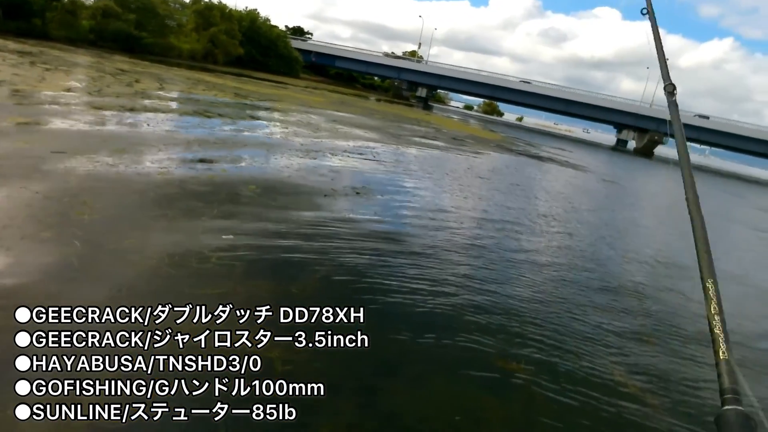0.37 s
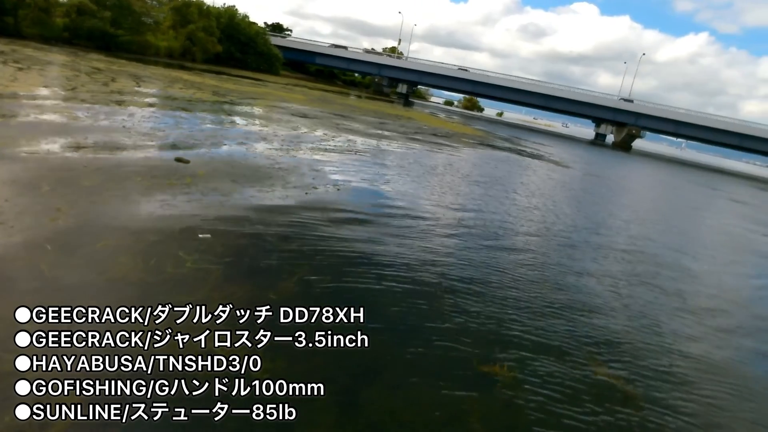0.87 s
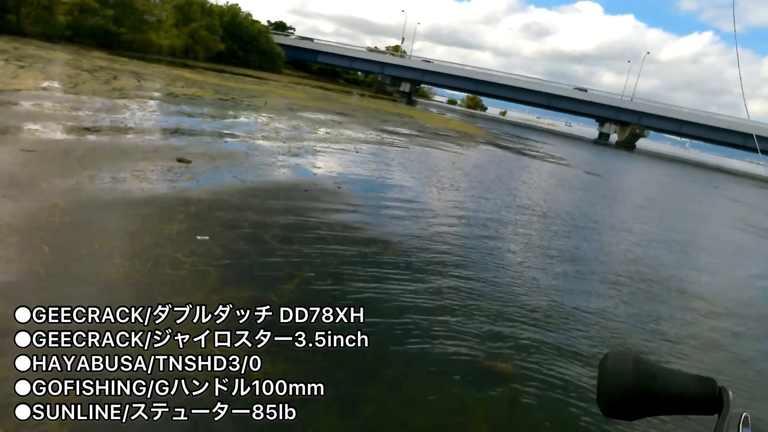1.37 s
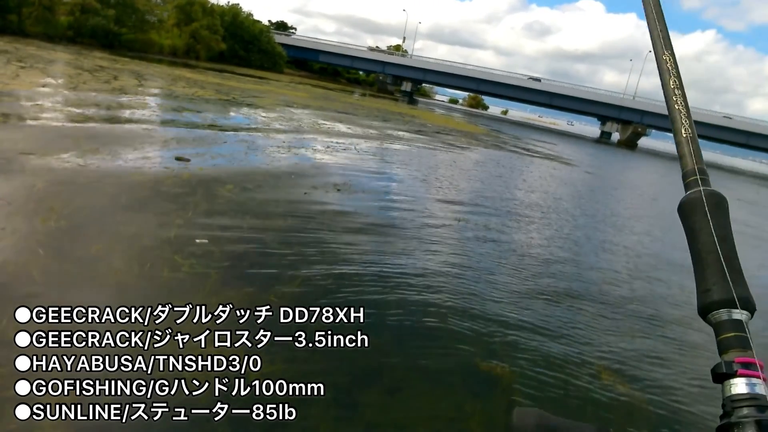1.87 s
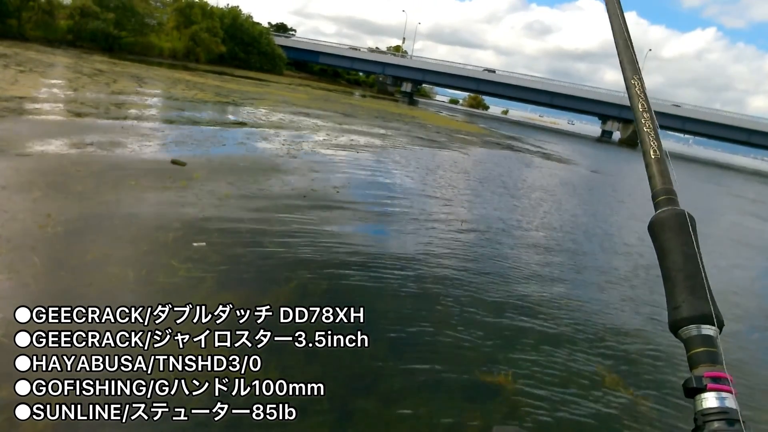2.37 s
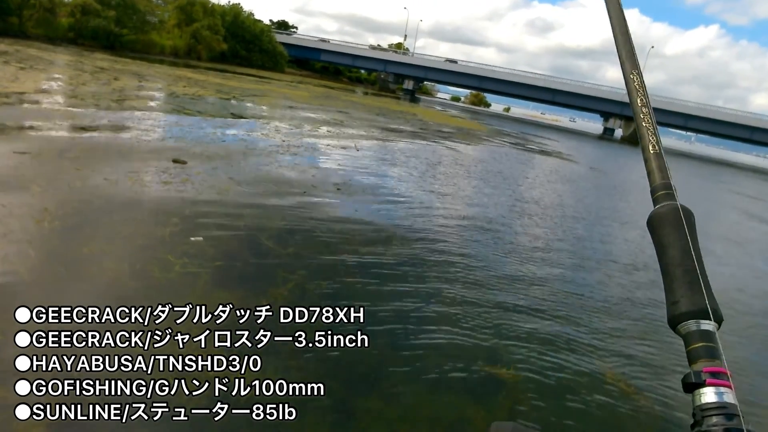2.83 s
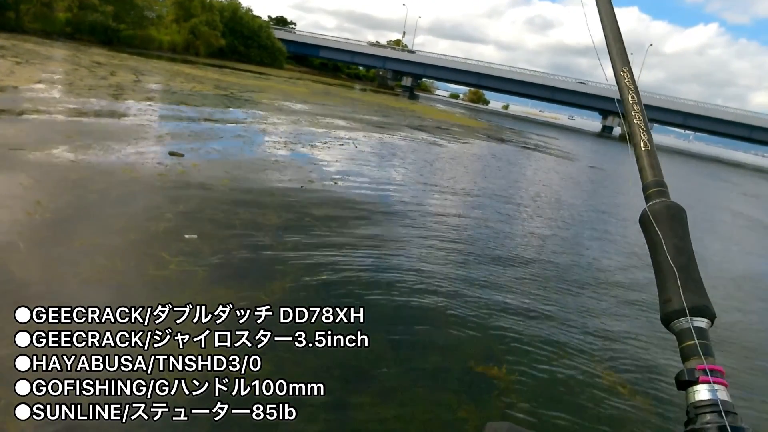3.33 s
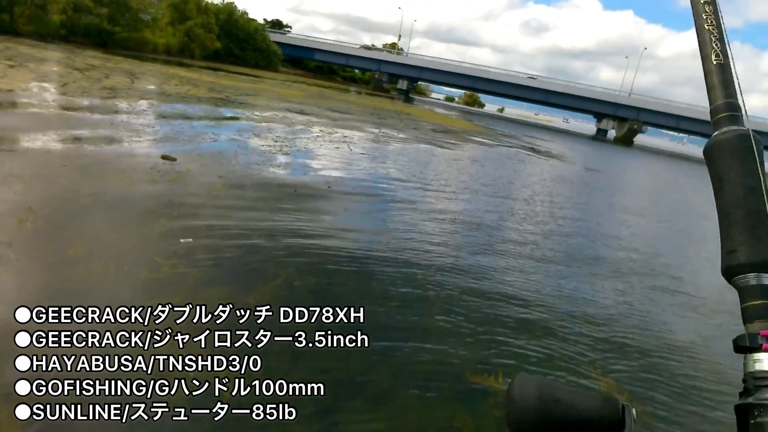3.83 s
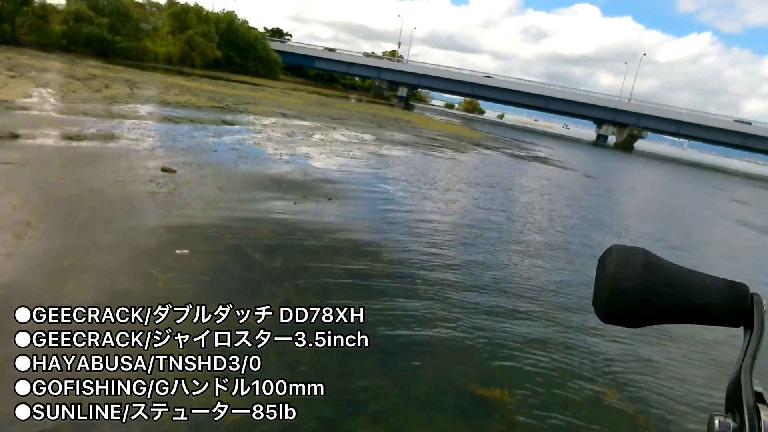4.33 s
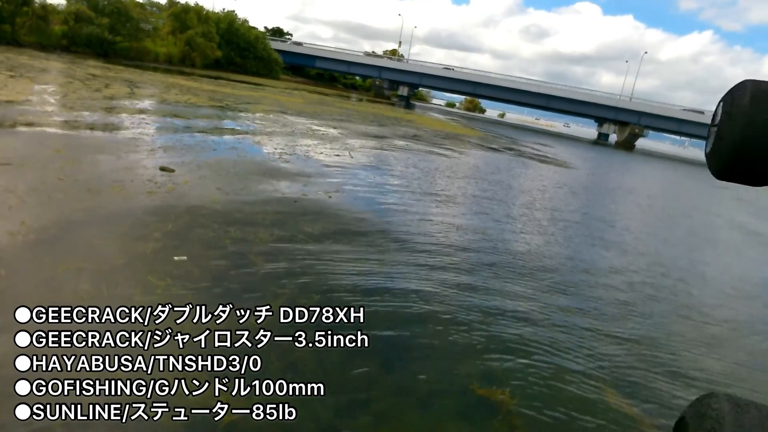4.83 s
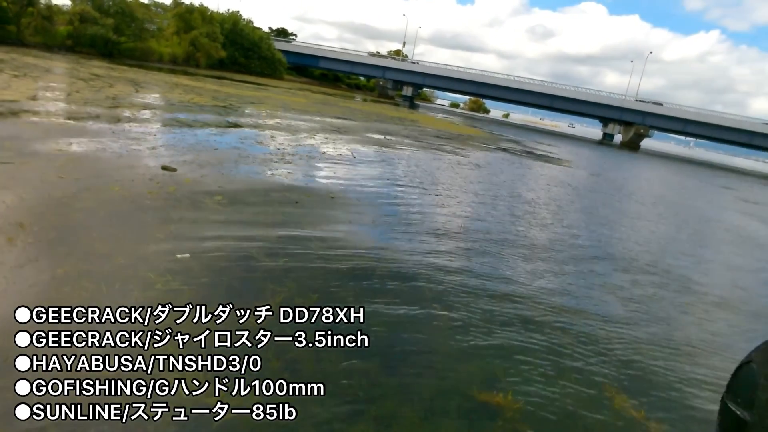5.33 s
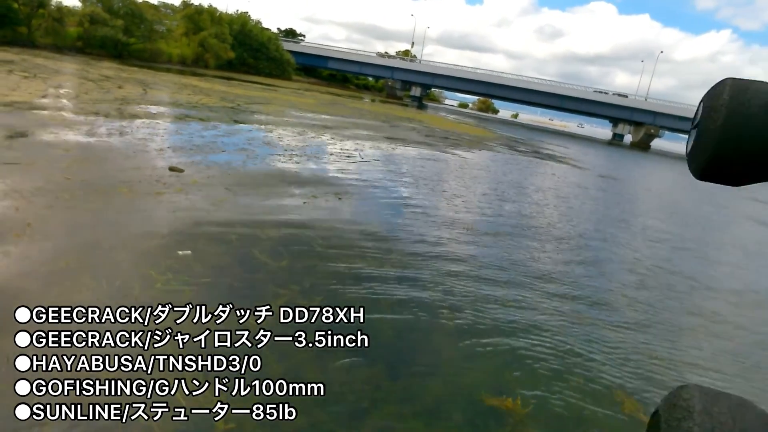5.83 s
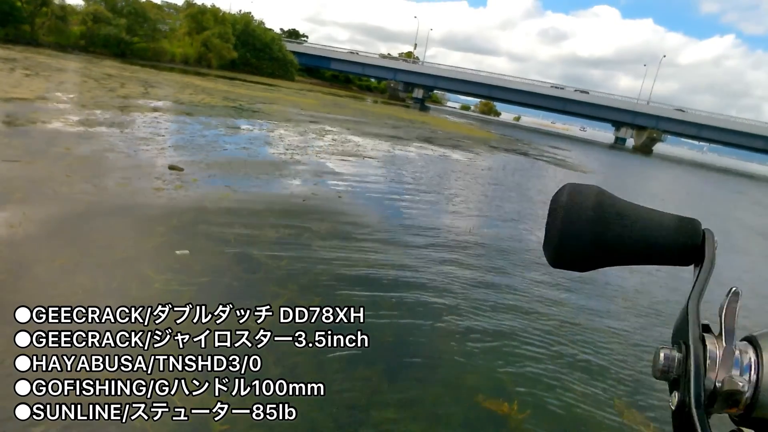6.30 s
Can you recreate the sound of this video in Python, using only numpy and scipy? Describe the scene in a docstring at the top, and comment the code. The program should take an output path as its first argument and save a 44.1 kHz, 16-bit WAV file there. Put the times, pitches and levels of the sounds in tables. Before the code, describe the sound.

Far-off engine note rises and drops through two gear changes above a deep throbbing motor, with a brief reel squeak and faint camera hiss.

```python
"""A road bridge over open water, two engines accelerating on it, heard by a small camera on the far side.
The high one, a stack of firing multiples, climbs and shifts gear twice; returns from piers, a bank and
the far shore shadow it. The low one throbs under it, shaft multiples sliding through pipe resonances.
Shaped noise makes the traffic roar, its fluttering edge and a rasp; a reel squeaks and ticks, and the
camera adds hiss, whines and a periodic buzz."""
import sys
import numpy as np
from scipy import signal
from scipy.fft import rfft, irfft, next_fast_len
from scipy.io import wavfile
from scipy.ndimage import uniform_filter1d

SR = 44100
rng = np.random.default_rng(int(sys.argv[2]) if len(sys.argv) > 2 else 0)


def digitize_waveform(pressure):
    """Quantize a signal to 16-bit integers and store it at the path in sys.argv[1].

    Rows of a 2-D input are taken as channels; values are limited to [-1, 1].
    """
    field = np.atleast_2d(pressure).T
    bounded = np.clip(field, -1, 1)
    quanta = np.round(bounded * 32767).astype(np.int16)
    wavfile.write(sys.argv[1], SR, quanta)


def voltage_ratio(level):
    """Linear amplitude factor for a level in decibels (scalar or array-like)."""
    return 10 ** (np.asarray(level, float) / 20)


N = 283771

# High engine over time. Each row: time in seconds, firing rate in Hz, level before the exhaust in dB,
# highest clear multiple.
HIGH_RUN = [(0, 121.4, -38, 2), (0.448, 140.1, -33.5, 3.5), (.68, 149.8, -30.5, 3.6), (.9, 160.7, -25, 3.8),
            (1.2, 169.1, -28.5, 2.2), (1.399, 175, -27, 2), (1.661, 187.9, -28, 2.2),
            (1.771, 193.1, -21, 4.6), (2.2, 204.7, -27, 4), (2.6, 216.7, -25, 4), (3.01, 226.2, -22, 4.2),
            (3.13, 229.6, -22, 3), (3.2, 231.3, -26.5, 4), (3.28, 233, -22, 2.6), (3.36, 234.7, -22, 2.3),
            (3.43, 237.6, -18.5, 2.2), (3.499, 241.5, -22, 2.4), (3.63, 247.6, -25.5, 2.4),
            (3.829, 248, -17.5, 1.7), (3.981, 250.7, -19.5, 1.7), (4.098, 254.7, -24.5, 2.3),
            (4.239, 256.8, -27.5, 2.2), (4.368, 227.9, -12.5, .8), (4.478, 215, -26, 1.5),
            (4.528, 221.3, -21, 1.8), (4.62, 274.3, -19, 1.6), (4.681, 304.7, -18.5, 1.6),
            (4.76, 232.9, -22, .8), (4.829, 227, -18.5, .6), (5.001, 225, -17, .6), (5.152, 223.5, -18, .6),
            (5.22, 221.9, -19, .6), (5.297, 214.6, -16.5, .6), (5.361, 200.3, -22.5, .6),
            (5.429, 184, -26, .8), (5.499, 170.9, -19.5, 1.8), (5.561, 154.4, -26.5, 1),
            (5.617, 140.9, -25, 1), (5.66, 155.5, -27, 1.3), (5.689, 189.9, -23, 2),
            (5.75, 176.9, -20.5, 1.8), (5.84, 176.7, -17, 1.5), (6, 178.5, -18.5, 1.6),
            (6.13, 180.9, -21, 1.7), (6.268, 184.2, -23, 1.8), (6.43, 190, -21.5, 1.7)]
# Swells and dips of roar and rasp. Each row: centre in seconds, half length in seconds, change in dB.
NOISE_SWELLS = [(.95, 0.19, 4), (2.1, 0.16, 0), (3.4, 0.31, 2.5), (4.2, 0.17, 0), (4.75, 0.16, 3),
                (6, 0.35, -2.5)]


def evened(x):
    """Scales to rms 1."""
    return x / np.sqrt(np.mean(x ** 2) + 1e-20)


def read(points, hz):
    """Reads a spectrum table at given frequencies, straight in log frequency."""
    table_hz, value = np.transpose(points)
    return np.interp(np.log(hz + 1), np.log(table_hz + 1), value)


def columns(rows):
    """First sample of a timed table, and its columns joined by straight lines."""
    s, *rest = np.transpose(rows)
    start = round(s[0] * SR)
    t = np.arange(start, min(round(s[-1] * SR), N)) / SR
    return start, [np.interp(t, s, c) for c in rest]


def add(mix, start, sound):
    """Mixes a sound in from a sample on."""
    part = mix[start:][:len(sound)]
    part += sound[:len(part)]


def drift(length, top_hz):
    """Random wavering below top_hz, rms about 1."""
    lowpass = signal.butter(2, top_hz, fs=SR / 64)
    slow = signal.lfilter(*lowpass, rng.standard_normal(length // 64 + 300))[200:]
    return np.interp(np.arange(length) / 64, np.arange(len(slow)), evened(slow))


def coloured(points):
    """Noise with the given spectrum, rms 1."""
    size = next_fast_len(N)
    hz = np.fft.rfftfreq(size, 1 / SR)
    spectrum = rfft(rng.standard_normal(size)) * voltage_ratio(read(points, hz))
    return evened(irfft(spectrum, size)[:N])


def partial(hz, db, twinkle_db, sway_rad):
    """A sine whose level and phase waver in the moving air over the water."""
    phase = 2 * np.pi * (np.cumsum(hz) / SR + rng.random())
    phase = phase + sway_rad * drift(len(hz), top_hz=9.84)
    level_db = db + twinkle_db * drift(len(hz), top_hz=9.4)
    return np.sqrt(2) * voltage_ratio(level_db) * np.sin(phase)


def bumps(rows):
    """A dB curve made of bell-shaped swells and dips."""
    t = np.arange(N) / SR
    return sum(db * np.exp(-((t - s) / half_s) ** 2) for s, half_s, db in rows)


def effort_db(follow, db_per_oct):
    """A level change that follows the high engine's smoothed level and speed; 0 dB at -22 dB, 200 Hz."""
    smooth_s = 0.18
    s, hz, db, _ = np.transpose(HIGH_RUN)
    change_db = follow * (db + 22) + db_per_oct * np.log2(hz / 200)
    return uniform_filter1d(np.interp(np.arange(N) / SR, s, change_db), round(smooth_s * SR))


def camera():
    """Electronics: steady hiss, thin whines, a tone blip per picture and a noise burst per write."""
    # Hiss spectrum. Each row: Hz, relative level in dB per Hz.
    hiss_colour = [(2000, -9), (2600, -8.5), (3100, -8.5), (4580, -10.5), (5680, -12), (8440, -15),
                   (9860, -13.5), (10800, -15), (14400, -14.5), (15700, -19)]
    # Whines. Each row: Hz, level before wavering in dB rms.
    whines = [(12602, -94), (14503, -91), (14530, -90), (14562, -87)]
    pictures_per_s, first_picture_s = 30.03, .0153
    write_every_s, first_write_s = 1.012, .72
    t = np.arange(N) / SR
    # distances from the nearest event, in cycles
    from_picture = ((t - first_picture_s) * pictures_per_s + .5) % 1 - .5
    from_write = ((t - first_write_s) / write_every_s + .5) % 1 - .5
    blips = np.exp(-(from_picture / 0.049) ** 2) * partial(np.full(N, 9770.), 0, twinkle_db=1.0, sway_rad=.8)
    burst_colour = [(8500, -25.5), (9400, 5.0), (10500, -4.0), (11500, -8.0), (13500, -8), (14500, 1.5),
                    (15500, -18.5)]  # Hz, relative dB
    bursts = np.exp(-(from_write / 0.012) ** 4) * coloured(burst_colour)
    whine = sum(partial(np.full(N, hz), db, twinkle_db=1.5, sway_rad=.3) for hz, db in whines)
    hiss = coloured([(1200, -35.0)] + list(hiss_colour))
    return voltage_ratio(-65) * hiss + voltage_ratio(-66.0) * blips + voltage_ratio(-62.0) * bursts + whine


def roar():
    """Dull noise of tyres, intake and scattered exhaust: distance has taken the treble."""
    # Each row: Hz, relative level in dB per Hz.
    roar_colour = [(15, 1.5), (40, 17), (80, 14), (130, 8), (250, 16), (450, 12.5), (700, 8.5), (1000, 5.5),
                   (1350, -5), (1600, -17.5), (1900, -21), (2250, -26), (3000, -39)]
    level_db = -31.5 + effort_db(follow=0.031, db_per_oct=2) + bumps(NOISE_SWELLS)
    return voltage_ratio(level_db + 1.3 * drift(N, top_hz=3.2)) * coloured(roar_colour)


def grit():
    """The upper edge of the traffic noise, fluttering quickly and drifting slowly."""
    # Each row: Hz, relative level in dB per Hz.
    grit_colour = [(1180, -28), (1700, 2), (2100, -2), (2600, -7), (3200, -20)]
    level_db = -66.5 + 2.5 * drift(N, top_hz=25) + 1.5 * drift(N, top_hz=4)
    return voltage_ratio(level_db) * coloured(grit_colour)


def rasp():
    """Faint bands of metallic noise that come with load; they swell further than the roar."""
    # Each row: Hz, relative level in dB.
    rasp_colour = [(2900, -22), (3500, -2), (3800, 0), (4150, -4), (4550, -2), (5200, -12), (6300, -6),
                   (7500, -22)]
    level_db = -77 + effort_db(follow=.3, db_per_oct=10) + 1.5 * bumps(NOISE_SWELLS)
    return voltage_ratio(level_db + 1.6 * drift(N, top_hz=8)) * coloured(rasp_colour)


def reel():
    """A thin two-partial squeak that jumps up, arches over and trails off; short decaying ticks."""
    # Squeak. Each row: time in seconds, Hz, level in dB rms and octave level in dB rms before wavering.
    squeak = [(1.148, 2300, -68, -80), (1.162, 2370, -60, -70), (1.19, 2630, -56, -73),
              (1.196, 2860, -72, -84), (1.205, 2900, -66, -75), (1.232, 2850, -66, -78),
              (1.25, 2660, -63, -84), (1.255, 2470, -60, -70), (1.275, 2390, -64, -74),
              (1.31, 2290, -67, -77), (1.355, 2200, -68, -82), (1.42, 2020, -71, -87),
              (1.5, 1880, -76, -95)]
    # Ticks. Each row: start in seconds, sine level before rise and decay in dB peak, Hz, t60 in seconds.
    ticks = [(1.653, -55, 6600, .014), (1.653, -56, 8800, .014), (1.656, -54, 4100, .014),
             (1.659, -55, 4000, .016), (1.663, -58, 8500, .012), (1.672, -51, 3000, .022)]
    out, t = np.zeros(N), np.arange(2000) / SR
    start, (hz, db, octave_db) = columns(squeak)
    add(out, start, partial(hz, db, twinkle_db=1.2, sway_rad=.2))
    add(out, start, partial(2 * hz, octave_db, twinkle_db=2.4, sway_rad=.5))
    for s, db, hz, t60_s in ticks:
        envelope = np.minimum(t / .0008, 1) * voltage_ratio(db - 60 * t / t60_s)
        grain = .25 * rng.standard_normal(len(t))
        add(out, round(s * SR), envelope * (np.sin(2 * np.pi * hz * t) + grain))
    return out


def banks(x):
    """Sparse scattered returns from piers and shore, one decaying tap of random sign a millisecond."""
    t60_s = 0.76
    slots = np.arange(2000, SR, 44)
    at = slots + rng.integers(0, 44, len(slots))
    taps = np.zeros(SR + 44)
    taps[at] = rng.choice([-1., 1.], len(at)) * voltage_ratio(-60 * at / SR / t60_s)
    return signal.fftconvolve(x, taps / np.linalg.norm(taps))[:N]


def low_engine():
    """The shaft throb and its multiples, which slide through the exhaust pipe's resonances."""
    # Run. Each row: time in seconds, shaft rate in Hz, level before the tables below in dB.
    run = [(0, 24.62, -44), (.38, 26.82, -36), (.9, 31.8, -40.5), (1.45, 35.79, -33), (2.1, 40.11, -34.5),
           (2.7, 44.42, -32.5), (3.3, 49.17, -30), (3.9, 54.65, -32.5), (4.39, 57.81, -25),
           (4.67, 60.57, -22.5), (4.96, 61.03, -26.5), (5.17, 63.9, -23), (5.42, 65.55, -24.5),
           (5.65, 67.55, -27), (5.8, 68.36, -32.5), (6, 59.2, -27), (6.25, 56.8, -26.5), (6.43, 56.4, -30)]
    # Shaft multiples. Each row: multiple, relative level in dB.
    shaft = [(2, -9), (3, -1.5), (4, 5.5), (5, 3), (6, -4), (7, -5), (8, 1), (9, 6.5), (10, -9), (11, -8),
             (12, -1)]
    # Exhaust pipe. Each row: Hz, gain in dB.
    pipe = [(70, -10), (110, -11.5), (170, -8), (230, -14.5), (310, -9), (400, -8.5), (550, -30.5),
            (800, -26)]
    # Throb under the exhaust note. Each row: Hz, gain in dB.
    throb_gain = [(25, -11.5), (32, -10.5), (42, -11.5), (50, -11.5), (55, -2), (58, -9), (61, -11),
                  (67, 0)]
    # Brief drops of the throb. Each row: centre in seconds, half length in seconds, change in dB.
    throb_gaps = [(2.69, 0.053, -14.5), (4.73, 0.042, -16), (5.916, 0.027, -23)]
    start, (hz, note_db) = columns(run)
    throb_db = note_db + read(throb_gain, hz) + bumps(throb_gaps)[start:start + len(hz)]
    note = sum(partial(k * hz, note_db + db + read(pipe, k * hz), twinkle_db=2.5, sway_rad=0.8)
               for k, db in shaft)
    return start, note + partial(hz, throb_db, twinkle_db=0.5, sway_rad=0.11)


def piers():
    """Weaker, unsteady copies a little under the pitch, from piers that the engine has passed."""
    # Each row: pitch factor, relative level in dB.
    returns = [(0.91, -11.5), (.935, -12.5)]
    far_db, near_db, rise_s, gone_s = -8.5, 1.5, 2.98, 4.3
    s, hz, level_db, clear = np.transpose(HIGH_RUN)
    # swell around rise_s, back to far_db at the gear change
    near = (s < gone_s) / (1 + np.exp((rise_s - s) / 0.1))
    heard_db = level_db + far_db + (near_db - far_db) * near
    return [high_engine(np.transpose([s, hz * factor, heard_db + db, clear]),
                        twinkle_db=1, sway_rad=0.52, first_db=-5.0) for factor, db in returns]


def bank_echo():
    """Echo of the high engine, lowered in pitch as it moves away from the bank."""
    # Each row: time in seconds, firing rate in Hz, level before the exhaust in dB, highest clear multiple.
    echo_run = [(0, 115, -32, 3.2), (.5, 131.8, -36.5, 3), (.68, 139, -24.5, 3.2), (1.05, 148.5, -20, 3.2),
                (1.25, 154.7, -26, 3), (1.55, 164.9, -31, 3.1), (1.85, 168.8, -37, 2.5),
                (3, 201.6, -30, 2.2), (3.9, 221.9, -34, 2.1), (4.5, 226.3, -41.5, 1.5)]
    return high_engine(echo_run, twinkle_db=1.2, sway_rad=0.032, first_db=-9.0)


def far_shore(x):
    """One distinct return from the far shore: delay in samples and the weakened copy."""
    return round(.22 * SR), voltage_ratio(-15.5) * x


def high_engine(rows, twinkle_db, sway_rad, first_db):
    """Firing multiples through the exhaust, muffled above the clear ones; higher ones waver more."""
    # Firing multiples. Each row: multiple, relative level in dB.
    firing = [(1, 2), (2, -6), (3, -8.5), (4, -13), (5, -21), (6, -29)]
    # Exhaust. Each row: Hz, gain in dB.
    exhaust = [(120, -5.5), (160, -11), (190, 0), (230, -1), (320, -0.5), (450, 3.5), (500, 4), (560, -3.5),
               (700, -7), (850, -4), (1500, -5)]
    # Unsteady air and load, sputter off load. Each row: time in seconds, factor on the phase wavering
    # of multiples above 2, sputter in dB.
    roughness = [(0, 2.6, 5.5), (.5, 2.2, 4.5), (.75, 1.3, .5), (1.2, 1, .3), (1.7, 1.3, .6), (3, 1.8, 1.2),
                 (3.35, 2.4, 1.5), (4.3, 2.2, 1.5), (4.5, 1.7, 1), (4.7, 1.7, 1), (5.3, 1.8, 1),
                 (5.4, 2.4, 4), (5.65, 2.4, 4), (5.75, 2.8, 1), (6.2, 2.8, 2), (6.43, 1.5, 2)]
    muffle_db_per_oct, muffle_most_db = -12.5, -33  # scattered sound fills in below the latter
    fading_db, fading_hz, sputter_hz = 0.93, 11, 22.4
    start, (hz, db, clear) = columns(rows)
    length = len(hz)
    _, rough_columns = columns(roughness)
    # hold the last value if the table ends early
    rough, sputter_db = (c[start:][np.minimum(np.arange(length), len(c) - start - 1)] for c in rough_columns)
    note = np.zeros(length)
    for k, own_db in firing:
        level_db = db + own_db + read(exhaust, k * hz)
        level_db = level_db + sputter_db * drift(length, sputter_hz)
        level_db = level_db + fading_db * (k - 1) * drift(length, fading_hz)
        if k == 1:
            level_db = level_db + first_db
        else:
            octaves = np.log2(k / np.maximum(clear, 1 / 3))
            level_db = level_db + np.clip(muffle_db_per_oct * octaves, muffle_most_db, 0)
        note += partial(k * hz, level_db, twinkle_db * np.sqrt(k), sway_rad * k * rough ** (k > 2))
    return start, note * signal.windows.tukey(length, .01)


def scene():
    """Engines with their scattered returns, over roar, grit, rasp, reel and camera."""
    engines = np.zeros(N)
    add(engines, *high_engine(HIGH_RUN, twinkle_db=1.37, sway_rad=0.11, first_db=0))
    add(engines, *far_shore(engines))  # the high engine alone so far
    add(engines, *bank_echo())
    add(engines, *low_engine())
    for start, copy in piers():
        add(engines, start, copy)
    background = camera() + roar() + grit() + rasp() + reel()
    return (background + engines + voltage_ratio(-10.5) * banks(engines))[None]


def roll_off(x):
    """The treble ends steeply here."""
    return signal.sosfilt(signal.butter(12, 15870, fs=SR, output="sos"), x)


def record(dry):
    """The converter adds a small constant offset to the mix."""
    offset = -.005
    return roll_off(dry + offset)


dry = scene()
out = record(dry)
digitize_waveform(out)
```